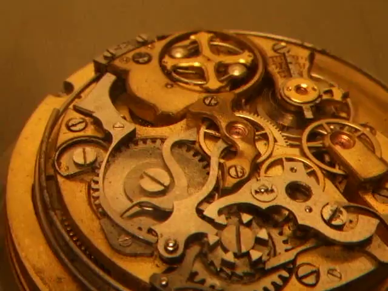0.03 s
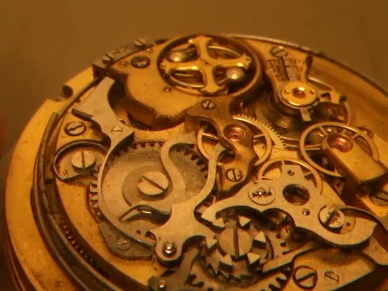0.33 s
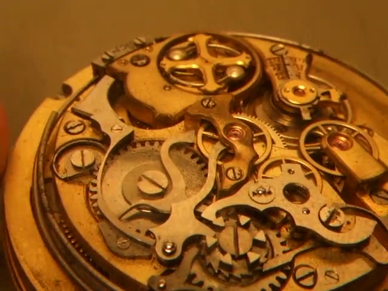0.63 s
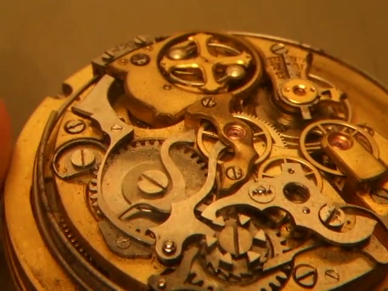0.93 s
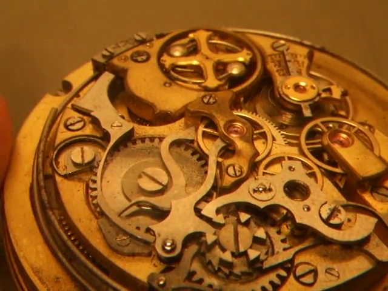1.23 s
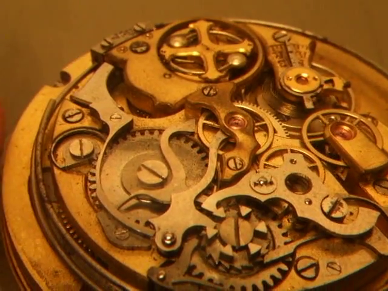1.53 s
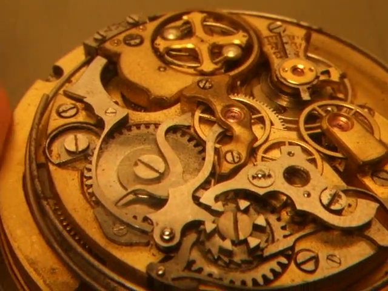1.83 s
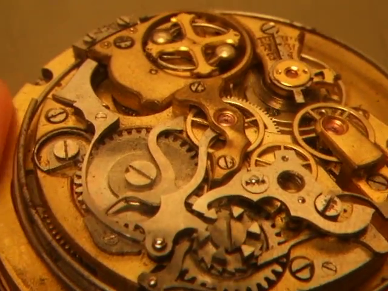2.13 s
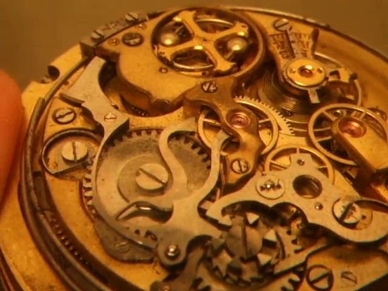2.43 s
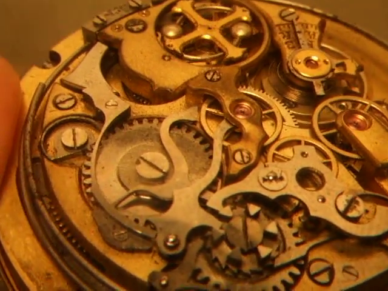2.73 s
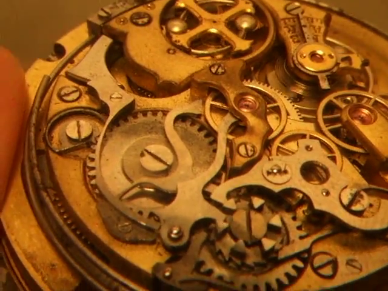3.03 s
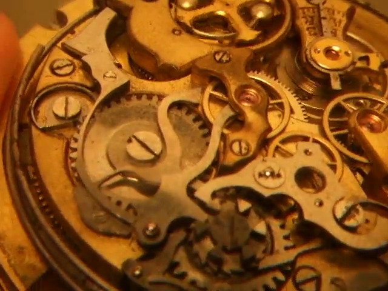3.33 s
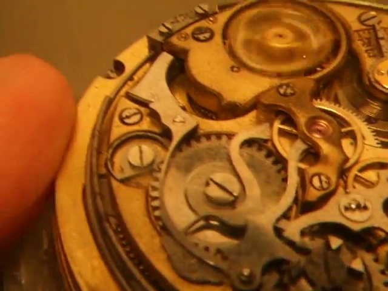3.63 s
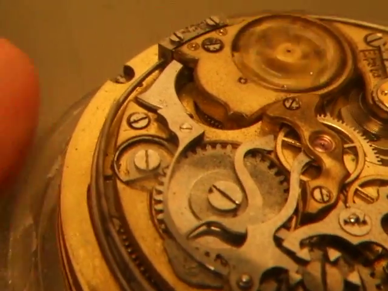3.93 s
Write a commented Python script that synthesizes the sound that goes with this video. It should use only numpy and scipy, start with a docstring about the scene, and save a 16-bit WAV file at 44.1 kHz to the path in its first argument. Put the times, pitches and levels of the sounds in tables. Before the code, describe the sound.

A pocket watch mechanism is handled close up in a quiet room, over faint gritty hiss. A click and loud ringing pop open, with a soft knock at 0.35 seconds. Muffled bumps and finger rubs gather from 1.5 seconds. A lever snaps sharply at 2.7, with tiny squeaks and low rumble. Clicks build from 3.3 into a loud clatter, and at 3.8 a high, bell-like chime rings.

```python
"""A repeater pocket watch is handled close to a small, coarse recorder in a quiet room.
The recorder switches on with a click, a scrape and a loud, ringing pop; soft handling pops on its body follow.
Levers snap, the slide squeaks, fingers rub; then the train is released with a clatter and a hammer
sets the wire gong ringing in beating pairs of partials. Blows ring decaying modes;
friction is band-passed noise. Eight-bit steps add a gritty hiss."""
import sys
import numpy as np
from scipy import signal
from scipy.fft import rfft, irfft
from scipy.io import wavfile
from scipy.ndimage import uniform_filter1d

SR = 44100
rng = np.random.default_rng(int(sys.argv[2]) if len(sys.argv) > 2 else 0)


def store_wav(level_fs):
    """Save 16-bit WAV to argv[1]."""
    pcm = np.round(np.clip(np.atleast_2d(level_fs), -1, 1) * 32767)
    wavfile.write(sys.argv[1], SR, pcm.T.astype(np.int16))


N = 176400
T = np.arange(N) / SR


def snaps():
    """Watch levers snap and rattle through short modes; the first two rows are the switch-on click."""
    # (time [s], level [dB], bass [dB], treble [dB], t60 ratio, rattle [dB], lift centre [Hz], lift [dB])
    hits = [(0.0355, -15.5, 6.5, 4, 0.33, -1.5, 1890, 4), (0.0418, -26.5, -3, 18.5, 0.85, -2, 5240, -1.5),
            (2.1743, -33, 20.5, -18, 0.38, -4, 1170, 1), (2.7084, -3, -12, -2.5, 0.44, -24.5, 4660, 13),
            (3.31, -53, -11, -15, 0.63, -4, 1510, -5), (3.3382, -32, -14, 5, 0.65, 2, 1480, -4),
            (3.3642, -11.5, 12, -4.5, 1.54, -17, 1890, 3.5), (3.3728, -13.5, -1, 8, 0.27, -11, 1570, -6),
            (3.495, -25, -18, -3, 0.25, -34, 5100, 12), (3.6391, -24, 0, 9.5, 0.48, -5.5, 2435, 14.5),
            (3.6953, -37.5, -20, 13, 0.6, -6, 3000, -6), (3.7567, -4, 8.5, -3.5, 0.33, 0, 2464, 11),
            (3.7627, -3, 12.5, -3, 0.2, -53, 2360, -10), (3.7726, -29, 11, -1, 0.52, 10.5, 630, 4),
            (3.778, -22.5, 9, 19.5, 0.27, -2.5, 2686, 17), (3.788, -21, 1, 6, 0.7, -7, 2350, 12.5),
            (3.7928, -20.5, -15, 8.5, 0.39, -35, 2370, 15.5), (3.8051, -29, -7, 7, 1.1, -16, 2300, 5),
            (3.836, -36.5, -10, 11.5, 0.69, -33, 6200, 14)]
    # (frequency [Hz], base level [dB], base t60 [s])
    snap_modes = [(520, -12.5, 0.012), (790, -23.5, 0.024), (1244, -8, 0.026), (1456, -8, 0.03),
                  (1837, -2.5, 0.012), (2341, -3, 0.0076), (2793, -6.5, 0.01), (3426, -16, 0.0065),
                  (4787, -13, 0.0065), (6170, -20.5, 0.0086), (6870, -16.5, 0.0023)]
    bass_hz, treble_hz, lift_width_oct = 970, 3900, 0.13
    hz, mode_db, t60_s = np.transpose(snap_modes)
    out = np.zeros(N)
    for start_s, db, bass_db, treble_db, t60_ratio, rattle_db, lift_hz, lift_db in hits:
        shelves_db = bass_db * shelf(bass_hz, hz) + treble_db * shelf(hz, treble_hz)
        peak_db = lift_db * np.exp(-(np.log2(hz / lift_hz) / lift_width_oct) ** 2)
        modes = zip(hz, db + mode_db + shelves_db + peak_db, t60_s * t60_ratio)
        add(out, start_s, blow(modes, rattle_db))
    return out


def case_knocks():
    """Knocks ring the case modes, each with its own pitch, treble and rattle."""
    # (time [s], level [dB], pitch ratio, treble [dB], rattle [dB])
    knocks = [(0.3483, -18.5, 0.86, -4.5, -13.5), (3.4475, -26.5, 0.94, -2, -15.5),
              (3.544, -34.5, 0.71, 3, -17), (3.633, -9.5, 1.067, -1, -11.5), (3.6433, -22, 1.35, -1, -14.5),
              (3.66, -27.5, 0.92, -6, -8.5), (3.7617, -6, 1.04, -7.5, -25.5),
              (3.8035, -19.5, .95, -6, -7.5)]
    # (base frequency [Hz], base level [dB], t60 [s])
    case_modes = [(169, -15.5, 0.061), (297, -8.5, .075), (554, -5.5, .04), (640.5, -10, .05),
                  (867, -8.5, .04), (1315, -13, 0.016), (2040, -17.5, 0.022), (2520, -18, .02)]
    hz, mode_db, t60_s = np.transpose(case_modes)
    out = np.zeros(N)
    for start_s, db, pitch_ratio, treble_db, rattle_db in knocks:
        levels_db = db + mode_db + treble_db * shelf(hz, corner_hz=1300)
        add(out, start_s, blow(zip(hz * pitch_ratio, levels_db, t60_s), rattle_db))
    return out


def gong():
    """The struck wire gong: pairs of close partials swell quickly and beat as they ring."""
    # (onset [s], frequency [Hz], level [dB], t60 [s], twin offset [Hz], twin relative level [dB])
    partials = [(3.805, 270, -56, 3.0, 2.0, -20), (3.805, 349, -58, 3.0, 2.0, -20),
                (3.805, 732, -46, 4.0, 4.8, -8), (3.805, 899, -53, 4.0, 2.0, -20),
                (3.805, 1427, -50, 3.0, 6.0, -18), (3.805, 1728, -60, 1.0, 3.0, -20),
                (3.838, 3354, -56, .4, 5.0, -15), (3.838, 4134, -64, .6, 3.0, -20),
                (3.805, 2341, -47, 4.0, 13.3, -2), (3.8221, 3467, -39, .5, 3.0, -20),
                (3.838, 3465, -28.5, .6, 4.2, -5), (3.825, 4777, -50, 4.0, 6.0, -5),
                (3.805, 6303, -42, 1.4, 9.0, -11), (3.811, 7979, -50, 2.5, 41.7, -1)]
    attack_s = 0.001
    out = np.zeros(N)
    for start_s, hz, db, t60_s, offset_hz, twin_db in partials:
        pair = ring([(hz, db, t60_s), (hz + offset_hz, db + twin_db, t60_s)])
        add(out, start_s, pair * (1 - np.exp(-T[:len(pair)] / attack_s)))
    return out


def plate_thuds():
    """The plate thuds in two low modes, mostly after the release."""
    # (frequency [Hz], level [dB], t60 [s])
    plate_modes = [(161.3, -2, 0.088), (234.3, -9, .06)]
    # (time [s], level [dB])
    thuds = [(0.35, -32.5), (3.64, -26), (3.7632, -24), (3.791, -19), (3.8135, -23)]
    return struck(plate_modes, thuds)


def squeaks():
    """Friction in three resonances: a brief scrape at switch-on, then the watch slide squeaking."""
    # (time [s], length [s], level [dB])
    strokes = [(0.034, 0.0073, -34.5), (2.693, 0.015, -34), (2.799, 0.019, -44), (2.882, 0.015, -38),
               (3.431, 0.0083, -44)]
    # (centre [Hz], width [Hz], relative level [dB])
    resonances = [(1390, 1100, 0), (3320, 400, 0), (6240, 750, -9)]
    out = np.zeros(N)
    for start_s, length_s, db in strokes:
        friction = sum(from_db(band_db) * band_noise(hz, width_hz) for hz, width_hz, band_db in resonances)
        add(out, start_s, from_db(db) * stroke(friction, length_s))
    return out


def recorder_pops():
    """A loud switch-on pop, then soft handling pops on the recorder's body: low-passed bipolar pulses."""
    # (time [s], peak [dB], build-up time constant [s], low-pass [Hz])
    pops = [(0.0451, -1, 0.00098, 3030), (0.162, -33, 0.0011, 800), (1.492, -28, 0.00063, 900),
            (1.849, -33.5, 0.00048, 700), (1.8986, -30, 0.00056, 750), (1.926, -37, 0.00044, 650),
            (1.965, -31, 0.00051, 650), (1.983, -33, 0.0006, 650), (2.007, -34, 0.00076, 650),
            (2.1298, -23, 0.0012, 850), (2.1319, -22.5, 0.0015, 750), (2.1472, -29, 0.0012, 700),
            (2.154, -32.5, 0.00021, 700), (2.461, -35, 0.00072, 850), (2.567, -22.5, 0.00082, 850),
            (2.776, -28, .001, 800), (2.888, -22, 0.00035, 700), (2.8945, -24.5, 0.0021, 600),
            (3.006, -37, 0.00051, 600), (3.084, -32.5, 0.00076, 500), (3.138, -34.5, 0.00025, 810),
            (3.179, -38, 0.00086, 610), (3.201, -33, 0.0015, 408), (3.273, -34.5, 0.0012, 590)]
    t = T[:SR // 20] - T[SR // 40]  # zero at the sign flip
    out = np.zeros(N)
    for centre_s, db, build_s, cutoff_hz in pops:
        bipolar = np.sign(t) * np.exp(-abs(t) / build_s)
        pulse = signal.filtfilt(*signal.butter(2, cutoff_hz, fs=SR), bipolar)
        add(out, centre_s + t[0], from_db(db) * pulse / pulse.max())
    return out


def thin_ring():
    """A thin two-tone ring follows the recorder's switch-on pop and, faintly, one sharp snap."""
    # (frequency [Hz], level [dB], t60 [s])
    tones = [(1895, 3, .45), (2430, -5, 0.63)]
    # (time [s], level [dB])
    onsets = [(.0453, -44), (2.7089, -55)]
    return struck(tones, onsets)


def rubs():
    """Fingers and sliding parts rub: strokes of band noise, cut off after 0.25 s at most."""
    # (time [s], length [s], level [dB], centre [Hz], width [Hz])
    strokes = [(0.042, 0.047, -57, 1400, 1500), (0.349, 0.041, -38.5, 824, 254),
               (0.406, 0.22, -50, 907, 530), (1.504, 0.022, -49.5, 1240, 394),
               (2.11, 0.27, -51.5, 1390, 1886), (2.416, 0.089, -49.5, 662, 618),
               (3.296, 0.069, -41, 1210, 1500), (3.331, 0.12, -56, 5030, 1200),
               (3.368, 0.18, -45, 610, 592), (3.469, 0.076, -56, 5000, 860),
               (3.477, 0.36, -48.5, 2303, 484), (3.528, 0.11, -40.5, 560, 392),
               (3.611, 0.11, -37.5, 570, 380), (3.755, 0.069, -29.5, 596, 400),
               (3.756, 0.07, -37, 2370, 900)]
    out = np.zeros(N)
    for start_s, length_s, db, hz, width_hz in strokes:
        add(out, start_s, from_db(db) * stroke(band_noise(hz, width_hz), length_s))
    return out


def hand_rumble():
    """The hand makes a low rumble that swells and ebbs."""
    # (time [s], level [dB])
    envelope = [(0, -53.5), (.6, -56.5), (.9, -60), (1.8, -62), (2.2, -48), (2.55, -46), (2.75, -34),
                (3.0, -40), (3.25, -34.5), (3.55, -37), (3.7, -48), (4, -66.5)]
    # (frequency [Hz], relative density [dB])
    spectrum = [(5, -10), (14, -0.5), (24, -3.5), (40, -12.5), (80, -21), (160, -35), (400, -48),
                (1500, -75)]
    return from_db(np.interp(T, *np.transpose(envelope))) * coloured_noise(spectrum)


def hiss(level_db=-53.5):
    """Faint, steady, dark background noise."""
    # (frequency [Hz], relative density [dB])
    spectrum = [(15, 0), (40, -2.5), (100, -7), (160, -8), (300, -12), (600, -11.5), (1000, -18.5),
                (2000, -22.5), (4000, -28.5), (8000, -33)]
    return from_db(level_db) * coloured_noise(spectrum)


def ring(modes, mode_ratio=1):
    """Half a second of decaying modes (Hz, dB, t60 s); mode k is scaled by mode_ratio ** k."""
    t = T[:SR // 2]
    return sum(mode_ratio ** k * from_db(db) * np.exp(-np.log(1000) * t / t60_s) * np.sin(2 * np.pi * hz * t)
               for k, (hz, db, t60_s) in enumerate(modes))


def struck(modes, hits):
    """Ring the modes once per hit (s, dB)."""
    out = np.zeros(N)
    for start_s, db in hits:
        add(out, start_s, from_db(db) * ring(modes))
    return out


def blow(modes, rattle_db, rattle_t60_s=.045):
    """One contact and a dying rattle of tiny ones, played through the modes."""
    t = T[:SR // 10]
    contacts = rng.standard_normal(len(t)) * (rng.random(len(t)) < .1)
    contacts *= np.exp(-np.log(1000) * t / rattle_t60_s)
    contacts *= from_db(rattle_db) / np.linalg.norm(contacts)
    contacts[0] += 1
    return signal.fftconvolve(contacts, ring(modes, mode_ratio=-1.089))  # signs alternate, +0.74 dB a mode


def stroke(noise, length_s, grain_db=2, grain_s=.008):
    """Friction noise swells and fades over length_s, catching unevenly."""
    grain = rms_one(uniform_filter1d(rng.standard_normal(len(noise)), int(grain_s * SR)))
    swell = np.sin(np.pi * np.minimum(T[:len(noise)] / length_s, 1))
    return rms_one(noise * from_db(grain_db * grain)) * swell


def band_noise(hz, width_hz):
    """0.25 s of noise in one resonance, rms 1."""
    low_hz = np.sqrt(hz * hz + width_hz * width_hz / 4) - width_hz / 2
    sos = signal.butter(2, [low_hz, low_hz + width_hz], "band", fs=SR, output="sos")
    return rms_one(signal.sosfilt(sos, rng.standard_normal(SR // 4)))


def coloured_noise(spectrum):
    """Noise shaped by (Hz, dB) points, rms 1."""
    hz, db = np.transpose(spectrum)
    bins_hz = np.maximum(np.fft.rfftfreq(N, 1 / SR), 1)
    gain = from_db(np.interp(np.log(bins_hz), np.log(hz), db))
    return rms_one(irfft(rfft(rng.standard_normal(N)) * gain, N))


def shelf(hz, corner_hz):
    """High-shelf weight, 0-1; swapped arguments give a low shelf."""
    return 1 / (1 + (corner_hz / hz) ** 4)


def from_db(db):
    """Decibels to gain."""
    return 10 ** (np.asarray(db) / 20)


def rms_one(x):
    """Scale to rms 1."""
    return x / np.sqrt(np.mean(x ** 2) + 1e-20)


def add(out, start_s, sound):
    """Mix a sound in from start_s."""
    i = max(int(start_s * SR), 0)
    out[i:i + len(sound)] += sound[:N - i]


def scene():
    """The watch and the handled recorder over a faint hiss, mono."""
    handling = recorder_pops() + rubs() + hand_rumble()
    clatter = case_knocks() + snaps() + plate_thuds() + thin_ring() + squeaks()
    return (clatter + gong() + handling + hiss())[None]


def record(dry):
    """An eight-bit converter at 17640 Hz adds grit; the sound drops out briefly and the top peaks clip."""
    # (from [s], to [s])
    dropouts = [(0, .036), (.3, .32), (.675, .688), (1.372, 1.388)]
    full_scale, steps_per_side = .714, 128
    converter_hz, cutoff_hz = 8850, 16000
    step = full_scale / steps_per_side
    live = 1 - sum((T >= from_s) & (T < to_s) for from_s, to_s in dropouts)
    biased = (dry - step / 2) * live  # rests between two steps
    slow = signal.resample_poly(biased, 2, 5, axis=1)
    stepped = step * np.clip(np.round(slow / step), -steps_per_side, steps_per_side)
    full_rate = signal.resample_poly(stepped, 5, 2, axis=1)[:, :N]
    smoothed = signal.sosfilt(signal.cheby2(16, 60, converter_hz, fs=SR, output="sos"), full_rate)
    clipped = np.clip(smoothed, -full_scale, full_scale)
    return signal.sosfilt(signal.cheby2(12, 70, cutoff_hz, fs=SR, output="sos"), clipped)


dry = scene()
out = record(dry)
store_wav(out)
```